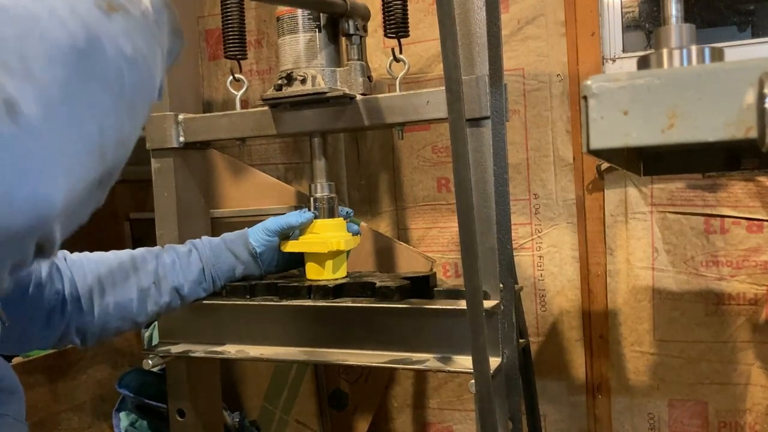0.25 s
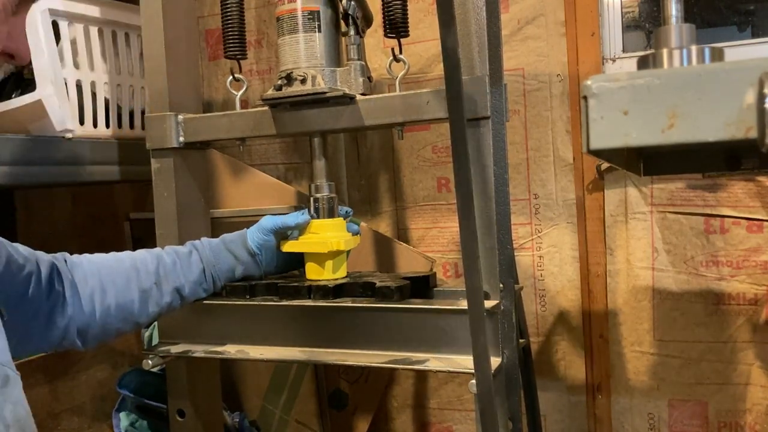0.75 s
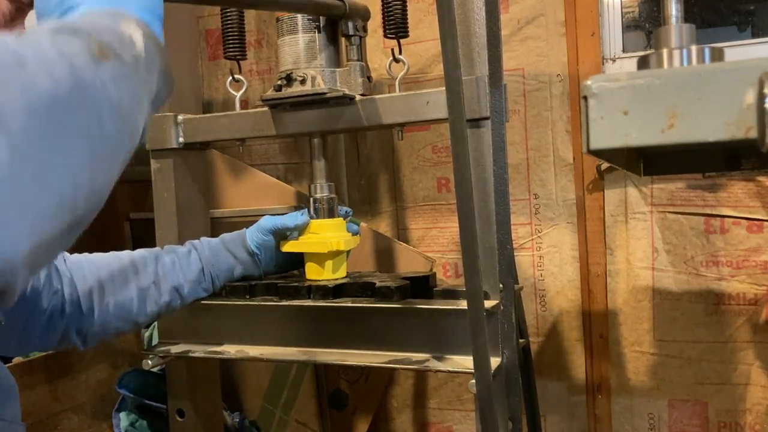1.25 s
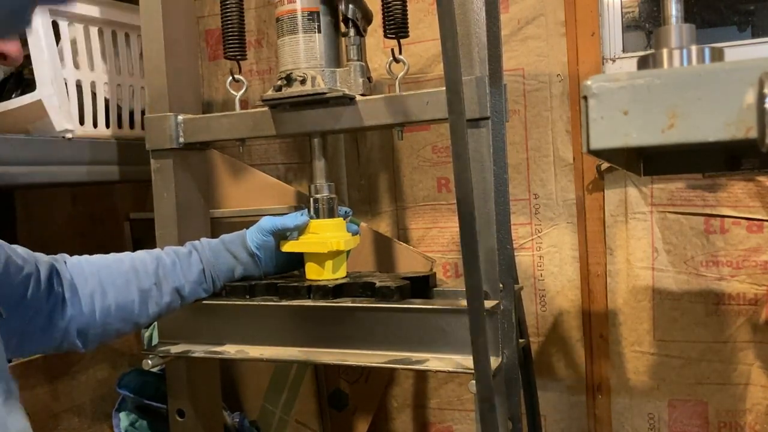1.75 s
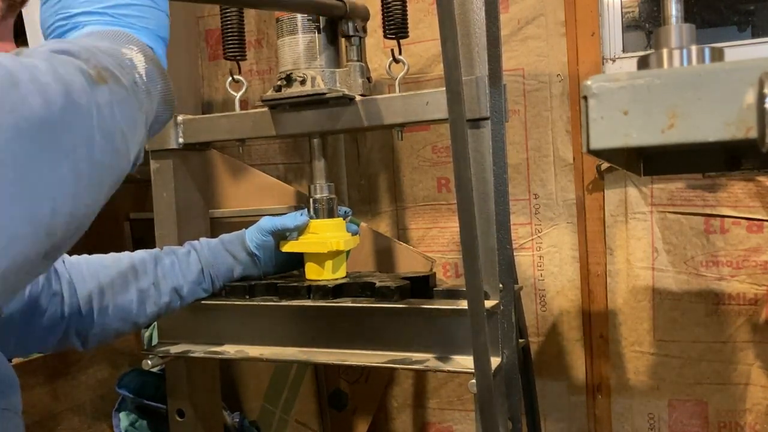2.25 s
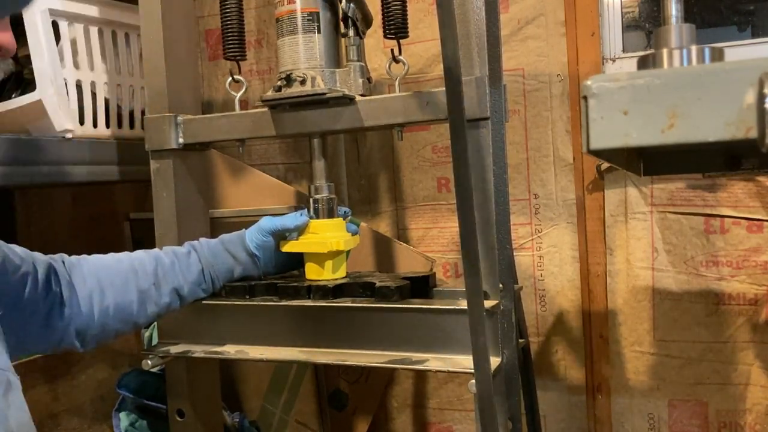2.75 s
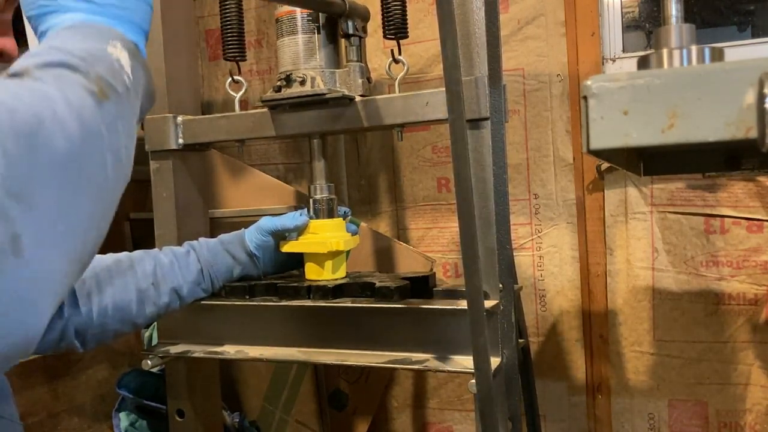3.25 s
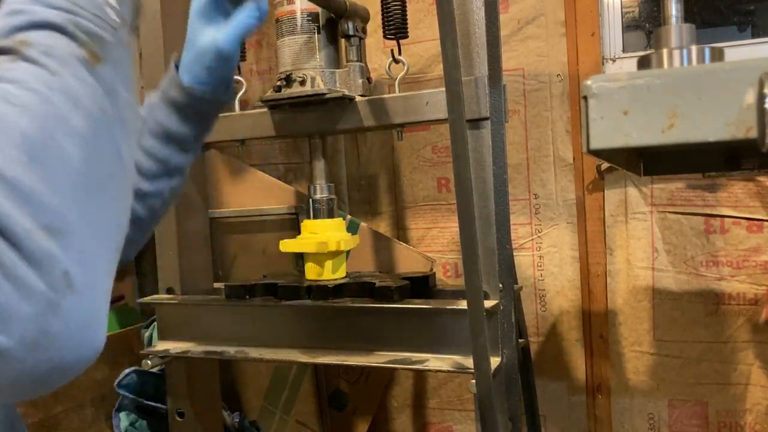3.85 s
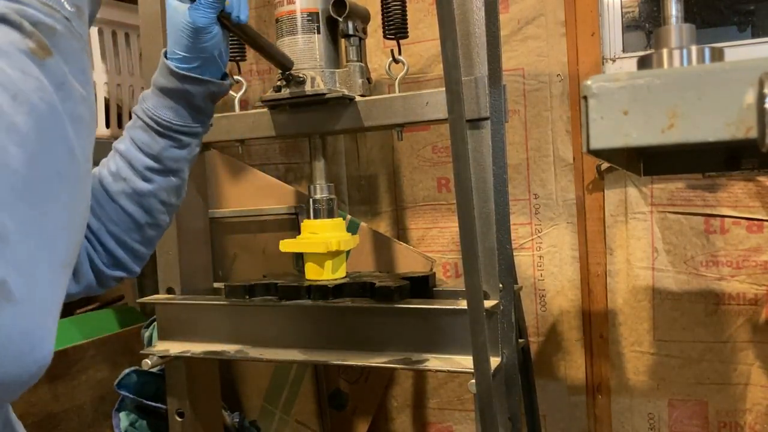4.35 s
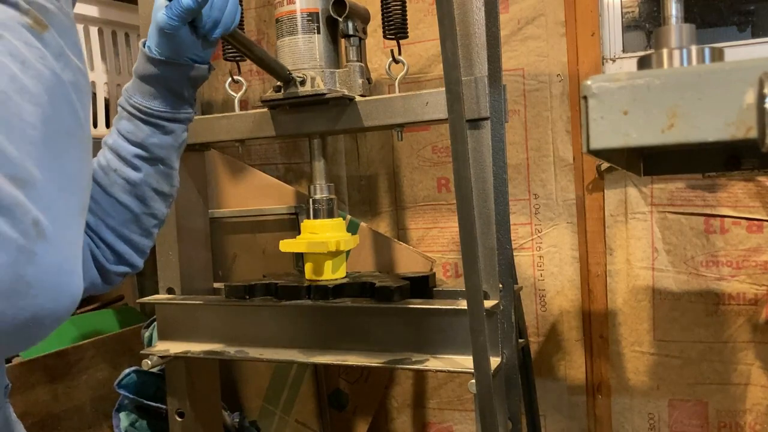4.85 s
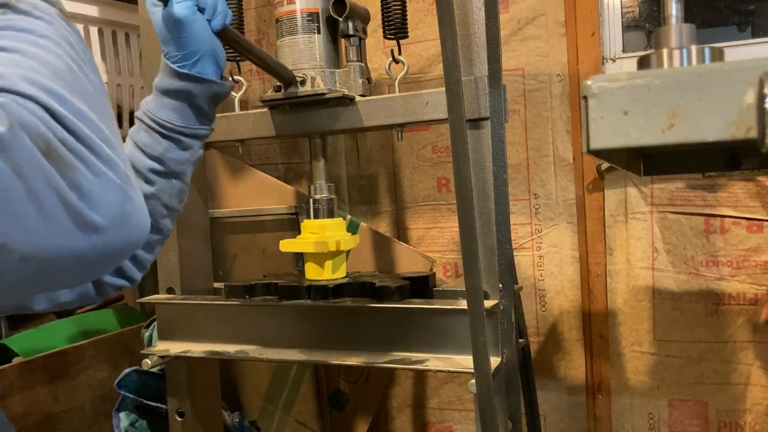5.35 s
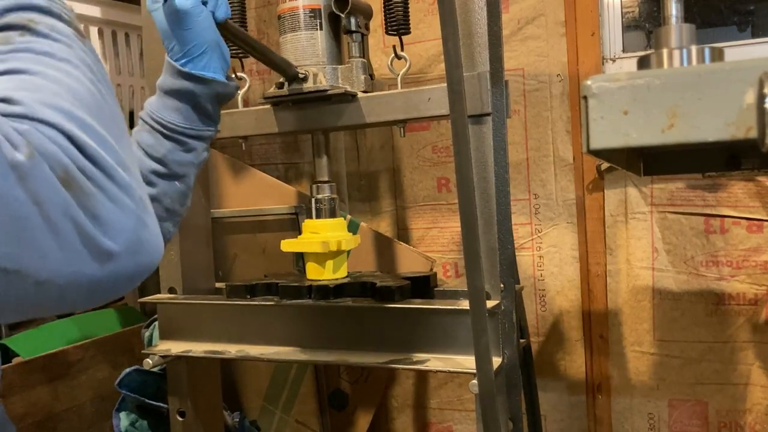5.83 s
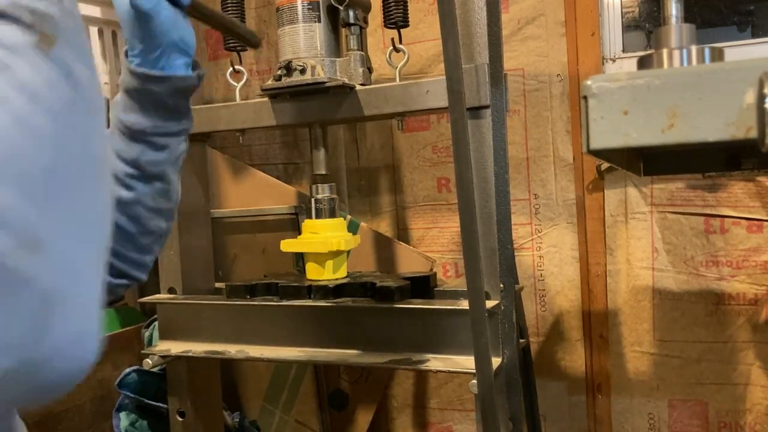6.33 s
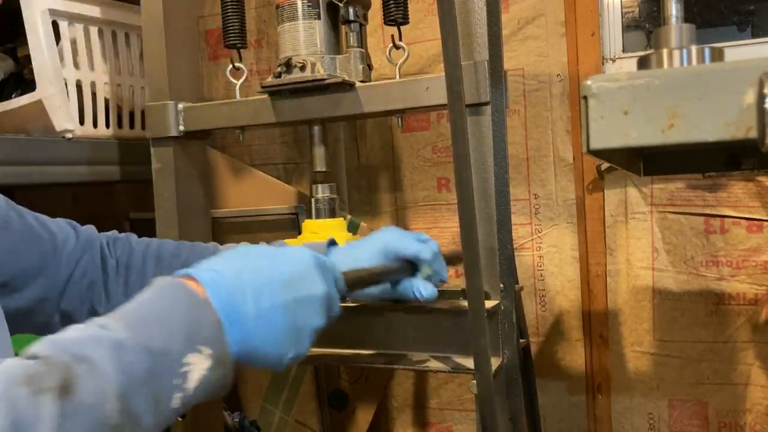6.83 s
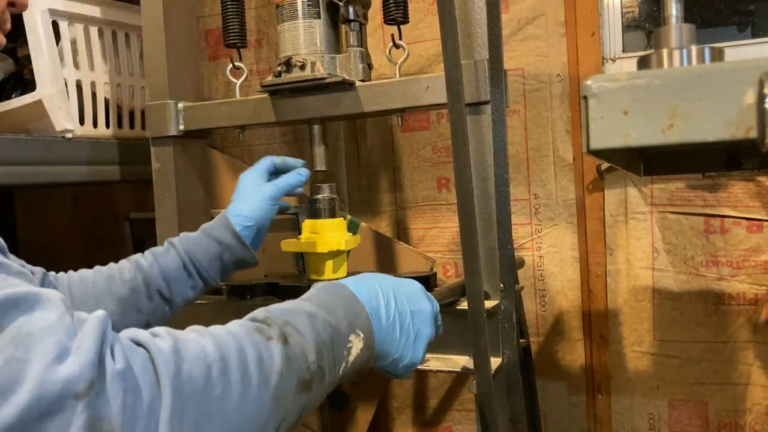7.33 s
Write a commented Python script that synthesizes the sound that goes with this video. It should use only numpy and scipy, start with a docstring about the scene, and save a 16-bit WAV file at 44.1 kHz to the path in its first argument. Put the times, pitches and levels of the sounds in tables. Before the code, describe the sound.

Two metallic bangs from a loaded shop press, then light pump clicks and clunks, a handle rattling loose with hard knocks, and a clang onto steel.

```python
"""A hand-pumped bottle-jack press slips with two bangs, then its pump linkage clicks and clunks.
The pipe handle is drawn out, knocks on the jack and frame, rings at light taps and clangs onto the bed.
Each blow layers coloured noise, ringing modes, low frame booms and a room tail.
Behind it the return springs hum as beating sines over a noise wash that the heavier blows feed.
A sleeve rustles and the air murmurs: both are coloured stereo noise."""
import sys
import numpy as np
from scipy import signal
from scipy.fft import rfft, irfft, next_fast_len
from scipy.io import wavfile
from scipy.ndimage import map_coordinates

SR = 44100
rng = np.random.default_rng(int(sys.argv[2]) if len(sys.argv) > 2 else 0)


def file_out(sig):
    """Save sig as 16-bit WAV at sys.argv[1]."""
    # one column per channel
    cols = np.atleast_2d(sig).T
    # limit, then scale
    lim = np.clip(cols, -1, 1)
    pcm = np.round(lim * 32767).astype(np.int16)
    wavfile.write(sys.argv[1], SR, pcm)


N = 334719
TAIL_S = np.arange(int(.75 * SR)) / SR  # time axis of one blow

# Still air, colour: pitch_hz, relative level_db
AIR_COLOUR = [(15, -29.5), (25, 10.5), (76, -6.5), (123, -17.5), (560, -20), (1040, -24), (1940, -32.5),
              (5880, -42), (7920, -37.5), (9320, -44), (10400, -46.5), (13600, -40.5), (16000, -27.5)]
# Sleeve movement before its trim and flutter: start_s, level_db
SLEEVE_MOVES = [(0, -63), (0.6, -68.5), (1.1, -81), (1.6, -74), (2.2, -77.5), (2.7, -87), (3.75, -75),
                (4.7, -78), (5.05, -68), (5.35, -67), (5.7, -49), (6.0, -65.5), (6.4, -66), (6.63, -56),
                (6.93, -64), (7.2, -64.5), (7.59, -77)]
# Cloth, colour: pitch_hz, relative level_db
CLOTH_COLOUR = [(500, -17), (2000, -3.5), (5000, -8), (8000, -6), (12000, 0.5), (16000, -10)]
# Return springs, beating lines: pitch_hz, relative level_db
SPRING_LINES = [(253.0, -74), (527.6, -63.5), (570.6, -72), (716.0, -79), (759.0, -58.5), (882.9, -70),
                (1023, -80.5), (1071, -52), (1125, -86)]
# Return springs, colour of the close modes: pitch_hz, relative level_db
SPRING_WASH = [(25, -26), (55, -9), (130, -21), (250, -17), (450, -22.5), (620, -6.5), (850, -22),
               (990, -7.5), (1070, 1.5), (1160, -5), (1300, -17.5), (2500, -33), (5000, -67)]

# Blow columns: start_s, strength_db, hardness_db_per_octave, jolt_db (shake of the frame),
# ring_db (against the strength)
# Handle landing on the bed: blow columns
CLANGS = [(6.975, -6, 0.5, -41, -6.5), (7.02, -27.5, -7, -49.5, -2)]
# Handle tapped and ringing freely: blow columns, spot_hz (mode favoured by the spot that is hit)
TAPS = [(3.8145, -27.5, 5.5, -49, -8.5, 4113), (3.8535, -26, 2, -46.5, 2.5, 2570),
        (3.8939, -35.5, 3, -56.5, 5.5, 1360), (3.934, -34.5, 5, -66, 5.5, 2581),
        (3.9685, -40, 4, -66, 8.5, 10137), (4.335, -33.5, 0.5, -62, -2.5, 1066),
        (4.3449, -29, -1.5, -49, -1.5, 2581), (6.2513, -49.5, 4.5, -50, -0.5, 2581),
        (7.1436, -20, -2, -43, -14, 2581), (7.2616, -20.5, -4, -42, -17, 4113),
        (7.331, -23.5, -5.5, -48.5, -6, 4113), (7.3619, -31.5, -7.5, -49, -4.5, 2581)]
# Handle knocking on the jack and shaking the frame: blow columns
KNOCKS = [(1.1658, -19, -2, -39, -8), (2.13, -29, -4, -44, -10), (3.468, -50, -7.5, -61, -13),
          (4.5938, -49, -7.5, -72, -14), (4.6647, -37.5, -12.5, -56, -12), (4.749, -17, -1.5, -35.5, -10.5),
          (5.1285, -20.5, -1, -36.5, -22), (5.184, -8, 2, -27.5, -0.5), (5.544, -37.5, -3, -30.5, -17),
          (5.569, -16, 4.5, -33, -13), (5.6121, -5, 2, -24, -3.5), (5.7351, -21.5, 4, -27, 0),
          (5.7919, -33.5, 4, -31, 2), (5.851, -10, -0.5, -23.5, -2), (6.088, -27.5, -10, -42, -3),
          (6.111, -15.5, -1, -36, -3.5), (6.1897, -32, -6, -41, -4.5), (7.4017, -28.5, -8.5, -53.5, -5.5),
          (7.5304, -51, -14.5, -48, -9)]
# Handle wrenched in its socket: start_s, level_db
WRENCHES = [(5.742, -25.5), (5.87, -34), (6.17, -35)]
# Pump linkage taking up its play: start_s, strength_db, hardness_db_per_octave
CLICKS = [(0.4756, -33, -2), (0.5564, -34.5, -2.5), (0.858, -35, -5), (0.884, -43, 5.5),
          (1.3534, -28.5, -3.5), (1.3981, -29, 2.5), (1.5355, -36.5, 0), (1.5902, -33.5, -4.5),
          (1.6106, -43.5, -2.5), (1.7741, -34.5, 4), (2.4157, -33.5, -7.5), (2.4604, -32.5, 4),
          (2.4959, -24, -0.5), (2.5483, -30.5, 0.5), (2.6211, -27.5, -1.5), (2.834, -32.5, -6.5),
          (2.8509, -44, 5.5), (3.0196, -49, 1), (3.2758, -66.5, 5.5), (3.7198, -34.5, 1),
          (3.7962, -37, 5.5)]
# Pump reaching the end of a stroke: blow columns
CLUNKS = [(0.914, -24, -0.012, -44, -10.5), (1.7997, -24, -0.053, -40.5, -10.5),
          (2.8746, -22, -0.0039, -40, -6)]
# Part slipping under load: blow columns
SLIPS = [(0.0811, -12, 0, -24, -5.5), (0.1997, -8.5, -1, -38, -0.5)]

# Contact and thud colours: pitch_hz, level_db (against the strength; the thud's against the jolt)
CLANG_COLOUR = [(90, -8), (270, -8), (870, 9), (2700, 9), (5000, 3.5), (8700, -1.5), (14000, 4.5)]
TAP_COLOUR = [(90, -6.5), (270, -7), (870, 16), (2700, 8), (5000, -3), (8700, -11.5), (14000, -12.5)]
KNOCK_COLOUR = [(90, -5.5), (270, 1), (870, 13), (1700, 12.5), (2700, 3), (5000, -7), (8700, -19),
                (14000, -19)]
CLICK_COLOUR = [(90, -5), (270, 3.5), (870, 14), (2700, 8.5), (5000, 1), (8700, 1.5), (14000, 0)]
CLUNK_COLOUR = [(90, -6), (270, 7.5), (870, 15), (2700, 7.5), (5000, -4), (8700, -11.5), (14000, -4)]
SLIP_COLOUR = [(90, -12.5), (270, -0.5), (870, 12.5), (2700, 12), (5000, -1), (8700, -6), (14000, -11.5)]
THUD_COLOUR = [(40, 8.5), (87, 23.5), (200, 21.5), (330, 14), (600, 3), (1500, -26.5), (5000, -60)]

# Modes of each steel piece: pitch_hz, relative level_db, t60_s (before the cap set for the blow)
BED_MODES = [(1020, 6, .24), (1900, -9, .3), (2549, -8, .4), (2797, -8, .3), (3375, -6, .28),
             (3644, 1, .36), (3889, -3, .29), (4760, 1, .3), (5569, -7, .32), (6476, -6, .29),
             (7402, -12, .31), (7642, -10, .31), (8341, -4, .22), (8436, -10, .21), (10131, -6, .45),
             (10344, -14, .4), (10847, 1, .28), (10995, -6, .27), (11281, -6, .27), (12228, -9, .35)]
PIPE_MODES = [(1066, -8, 0.6), (1338, -8, 0.6), (1933, -11, 0.6), (2581, 2, 0.6), (4113, -6, 0.5),
              (5830, -16, 0.45), (10137, -8, 0.58), (10559, -12, 0.6), (10861, -6, 0.6), (11394, -22, 0.55)]
FRAME_MODES = [(310, -9, 0.6), (433, -10, 0.53), (528, -6, 0.53), (619, -9, 0.52), (732, -2, 0.43),
               (832, -6, 0.47), (974, -11, 0.47), (1071, -8, 0.6), (1252, -3, 0.41), (1370, -1, 0.54),
               (1470, -11, 0.56), (1537, -7, 0.6), (1620, -4, 0.4), (1688, -11, 0.41), (1973, -4, 0.37),
               (2113, -1, 0.37), (2175, -12, 0.39), (2323, -4, 0.41), (2433, -8, 0.42), (2490, -11, 0.46),
               (2606, -6, 0.5), (2807, -8, 0.6), (3311, -13, 0.39), (3513, -15, 0.52), (3644, -18, 0.53),
               (3830, -16, 0.48), (4059, -9, 0.48), (4546, -17, 0.47), (4643, -17, 0.46), (5348, -21, 0.5)]
LINKAGE_MODES = [(1803, -7, 0.2), (2347, -7, 0.2), (2832, -8, 0.2), (3319, -12, 0.2), (3809, -10, 0.2),
                 (4148, -11, 0.2), (5897, -11, 0.2), (7755, -11, 0.2), (8958, -12, 0.11), (9246, -12, 0.2),
                 (10559, 0, 0.1), (11913, -14, 0.2)]
PLATE_MODES = [(253, -14, 0.8), (519, -12, 0.47), (616, -13, 0.57), (735, -7, 0.28), (1082, -10, 0.52),
               (1214, -4, 0.34), (1367, -6, 0.8), (1556, -8, 0.44), (1943, -9, 0.29), (2097, -14, 0.43),
               (2266, -14, 0.36), (2431, -13, 0.37), (2549, -14, 0.37), (2662, -13, 0.36), (2813, -5, 0.27),
               (3039, -12, 0.47), (3254, -18, 0.35), (3548, -13, 0.32), (3830, -12, 0.32),
               (3976, -16, 0.35), (4089, -16, 0.43), (4751, -4, 0.4), (5760, -19, 0.33), (6823, -19, 0.28)]
# Low modes of the whole frame: pitch_hz, level_db (against the jolt, before the boom trim), t60_s
SWAY_MODES = [(71.7, -6, 0.4), (99, 0.5, 0.24), (124.8, -9.5, 0.29), (206.5, -8, 0.55), (238, -8, 0.37),
              (295, -11.5, 0.21), (345, -12, 0.41)]
# Frame drone under the wrenches: pitch_hz, level_db (against the wrench), t60_s
DRONE_MODES = [(221, -6.5, 0.54), (254.5, 1.5, 0.61)]
# Barely damped notes of the bed, frame and plate: pitch_hz, level_db (against the ring), t60_s
BED_NOTES = [(4600, -37, 1.7)]
FRAME_NOTES = [(1367, -22, 1.08), (1595, -15, 0.48), (1594, -17, 0.39), (3500, -34.5, 0.9)]
PLATE_NOTES = [(129.5, -31.5, 2.4), (1367, -12, 2.2)]

# Room decay: pitch_hz, t60_s
ROOM_DECAY = [(70, 0.74), (250, 0.71), (1000, 0.36), (3000, 0.39), (7000, 0.32), (14000, 0.28)]
# Stereo width of the direct contact noise: pitch_hz, left_right_likeness (1 is mono)
DIRECT_ALIKE = [(100, 1), (500, 0.76), (2000, 0.53), (8000, 0.22)]
# Stereo width of the room and background noise: pitch_hz, left_right_likeness (1 is mono)
ROOM_ALIKE = [(100, 0.94), (300, 0.92), (700, 0.6), (2000, 0.05), (10000, .2)]
# Microphone colour: pitch_hz, level_db
MICROPHONE = [(25, -31.5), (45, -10), (65, 4), (110, 3), (160, -1.5), (250, 4.5), (600, -7), (2200, -6),
              (3200, -2.5), (4700, 1.5), (6000, -1.5), (8300, 4.5), (11000, -1.5), (16000, -13)]
# Notches of the microphone port: centre_hz, width_hz, depth_db
PORT_DIPS = [(9114, 710, 22), (14360, 650, 16)]

TOP_HZ = 16200  # band limit
CLICK_JOLT_DB, CLICK_RING_DB = -18, -5.5  # against the strength of a click; hardness adds to the ring
SWAY_LAG_S, SWAY_RISE_S = .018, 0.014  # the heavy frame answers late
FAVOUR_DB, FAVOUR_OCTAVES = 6.5, .3  # lift and width around the favoured pitch
PLATE_AT_START_DB, SPRINGS_AT_START_DB = -19, -45  # both still ring from an earlier slip
SPRING_T60_S, SPRING_RISE_S = 5.48, 0.031
SLIP_TO_SPRING_DB, BLOW_TO_SPRING_DB = -38, -46  # a slip jerks the springs hardest
HARDNESS_PIVOT_HZ = 1500  # the contact colour tilts around this
HIGH_MODE_HZ = 3000  # modes above this follow the hardness of the contact


def amp(db):
    """Decibels to gain."""
    return 10 ** (np.asarray(db) / 20)


def unit(x):
    """Scale to rms 1."""
    return x / np.sqrt(np.mean(x ** 2) + 1e-20)


def along(points, hz):
    """Read a (pitch, value) curve on a log pitch axis."""
    pitch, value = np.transpose(points)
    return np.interp(np.log(hz + 1), np.log(pitch + 1), value)


def curve(rows):
    """Draw (time, value) rows as one value per sample."""
    return np.interp(np.arange(N) / SR, *np.transpose(rows))


def wobble(rate, size):
    """A smooth random curve, rate knots a second."""
    knots = rng.standard_normal(int(size * rate / SR) + 4)
    return map_coordinates(knots, [np.arange(size) * rate / SR])


def fade(t, t60):
    """Exponential decay, 60 dB down after t60 seconds."""
    return np.exp(-np.log(1000) * t / np.maximum(t60, 1e-3))


def filtered(x, response):
    """Shape x by a response of frequency."""
    size = x.shape[-1]
    padded = next_fast_len(size + 4096)
    spectrum = rfft(x, padded) * response(np.fft.rfftfreq(padded, 1 / SR))
    return irfft(spectrum, padded)[..., :size]


def add(track, start_s, sound):
    """Mix a sound into the track from its start time."""
    start = max(round(start_s * SR), 0)
    track[:, start:start + sound.shape[-1]] += sound[..., :N - start]


def noise(spectrum, alike, size):
    """Stereo noise with a colour and a left-right likeness, balanced between mid and side."""
    def mid_side(hz):
        turn = np.arccos(np.clip(along(alike, hz), -1, 1)) / 2
        return amp(along(spectrum, hz)) * [np.cos(turn), np.sin(turn)]

    mid, side = filtered(rng.standard_normal((2, size)), mid_side)
    return np.array([mid + side, mid - side])


def placed(x, lead_ms, pan_db):
    """Sound from the left reaches the left port sooner and louder."""
    side = np.array([[.5], [-.5]])
    return filtered(x, lambda hz: amp(side * pan_db) * np.exp(2j * np.pi * hz * side * lead_ms / 1000))


def lingering(kicks, t60, rise_s):
    """Envelope of a resonator that stores the energy of (s, dB) kicks and slowly loses it."""
    start_s, level_db = np.transpose(kicks)
    energy = np.bincount(np.round(start_s * SR).astype(int), amp(level_db) ** 2, N)
    stored = signal.lfilter([1], [1, -fade(1 / SR, t60) ** 2], energy)
    keep = np.exp(-1 / (rise_s * SR))
    return np.sqrt(signal.lfilter([1 - keep], [1, -keep], stored))


def singing(kicks, modes, rise_s):
    """Barely damped modes sing on after (s, dB) kicks."""
    t = np.arange(N) / SR
    return sum(amp(db) * np.sin(2 * np.pi * hz * t) * lingering(kicks, t60, rise_s)
               for hz, db, t60 in modes)


def notes(table, modes, earlier=()):
    """Each blow kicks the long notes of the steel as hard as it rings."""
    kicks = [(start_s, strength + ring_db) for start_s, strength, _, _, ring_db in table]
    return singing(kicks + list(earlier), modes, rise_s=.003)


def favoured(modes, centre_hz):
    """The spot that is hit drives the modes near one pitch more than the rest."""
    def lift(hz):
        return FAVOUR_DB * np.exp(-(np.log2(hz / centre_hz) / FAVOUR_OCTAVES) ** 2)

    return [(hz, db + lift(hz), t60) for hz, db, t60 in modes]


def sways(table, favoured_hz, boom_db):
    """Low modes of the whole frame boom in proportion to each jolt."""
    track = np.zeros((2, N))
    hz, db, t60 = np.transpose(favoured(SWAY_MODES, favoured_hz))
    waves = np.sin(2 * np.pi * hz[:, None] * TAIL_S) * fade(TAIL_S, t60[:, None])
    waves *= 1 - np.exp(-TAIL_S / SWAY_RISE_S)
    for start_s, _, _, jolt, _ in table:
        gain = amp(jolt + boom_db + db + rng.standard_normal(len(hz)))
        add(track, start_s + SWAY_LAG_S, gain @ waves)
    return track


def rebounding(table, flight_s, loss_db, softer):
    """Each blow gets a duller second contact, quieter by loss_db (louder if negative)."""
    return table + [(start_s + flight_s, strength - loss_db, hardness - softer, jolt - loss_db, ring_db)
                    for start_s, strength, hardness, jolt, ring_db in table]


def blow_colour(colour, strength, hardness, jolt):
    """A harder contact tilts the colour towards the treble; the jolt adds a thud below it."""
    hz = np.geomspace(40, 16000, 40)
    octaves = np.maximum(np.log2(hz / HARDNESS_PIVOT_HZ), -1)
    clash = amp(strength + along(colour, hz) + hardness * octaves)
    thud = amp(jolt + along(THUD_COLOUR, hz))
    return np.column_stack([hz, 20 * np.log10(np.hypot(clash, thud))])


def crowded(spectrum, depth_db):
    """Countless short-lived modes cut a colour into peaks and valleys, new for each contact."""
    hz = np.geomspace(630, 17000, 170) - 600
    peaks = depth_db * np.clip(rng.standard_normal(len(hz)), -2, 2) * np.minimum(hz / 500, 1)
    mean_lift_db = 10 * np.log10(np.mean(amp(peaks) ** 2))
    return np.column_stack([hz, along(spectrum, hz) + peaks - mean_lift_db])


def ring(modes, spectrum, longest_s, prompt_db, contact_t60):
    """Modes sound a prompt part while the pieces touch, then ring freely; a dull blow weakens high ones."""
    hz, db, t60 = np.transpose(modes)
    t = TAIL_S[::64]  # coarse grid for the slow envelopes
    dull = np.minimum(along(spectrum, hz) - along(spectrum, 2700), 0) / 3
    shared_spread = 2 * rng.standard_normal(len(hz))
    side_spread = 2 * rng.standard_normal((2, len(hz)))
    gain = amp(db + dull + shared_spread + side_spread)
    phase, beat_phase = rng.uniform(0, 2 * np.pi, (2, len(hz), 1))
    # each mode stands for a close pair, so it beats at its own rate
    beat_hz = rng.uniform(6, 28, (len(hz), 1))
    beat = 1 + .55 * np.cos(2 * np.pi * beat_hz * t + beat_phase)
    free = beat * fade(t, np.minimum(t60, longest_s)[:, None])
    life = free + amp(prompt_db) * fade(t, contact_t60)
    waves = [np.sin(2 * np.pi * f * TAIL_S + p) * np.interp(TAIL_S, t, envelope)
             for f, p, envelope in zip(hz, phase, life)]
    return gain @ np.array(waves) / np.linalg.norm(amp(db))


def workshop(spectrum, build_s):
    """The room's answer builds up, slowest in the bass, and each pitch dies at its own speed."""
    hz, t, cells = signal.stft(noise(spectrum, ROOM_ALIKE, len(TAIL_S)), SR, nperseg=256)
    swell = 1 - np.exp(-t / (build_s + 1.8 / (hz[:, None] + 60)))
    decay = fade(t, along(ROOM_DECAY, hz)[:, None])
    return signal.istft(cells * swell * decay, SR, nperseg=256)[1][:, :len(TAIL_S)]


def blows(table, colour, modes, t60, contact_db, snap_db, steel_db, prompt_db, room_db,
          scuff_db, scuff_t60, rise_s, build_s, chatter_db, longest_s):
    """Steel meets steel: a scuff, a bright snap, a chattering clash, the ring of the piece and the room."""
    track, size = np.zeros((2, N)), len(TAIL_S)
    lead = SR // 25  # length of scuff and snap in samples
    for start_s, strength, hardness, jolt, ring_db in table:
        spectrum = blow_colour(colour, strength, hardness, jolt)
        metal = crowded(spectrum, 6)
        chatter = amp(contact_db + chatter_db * wobble(260, size))
        contact = chatter * noise(metal, DIRECT_ALIKE, size)
        driven = [(hz, db + hardness * np.log2(max(hz / HIGH_MODE_HZ, 1)), life) for hz, db, life in modes]
        steel = amp(strength + ring_db + steel_db) * ring(driven, spectrum, longest_s, prompt_db, t60)
        room = amp(room_db) * workshop(metal, build_s)
        onset = 1 - np.exp(-TAIL_S / rise_s)
        add(track, start_s, (contact * fade(TAIL_S, t60) + steel + room) * onset)
        snap = filtered(contact[:, lead:2 * lead], lambda hz: hz ** 2 / (hz ** 2 + 6000 ** 2))
        add(track, start_s + rise_s, amp(snap_db) * snap * fade(TAIL_S[:lead], 0.023))
        # the scuff swells until the pieces meet
        scuff = contact[:, -lead:] * fade(TAIL_S[:lead], scuff_t60)[::-1]
        add(track, start_s + rise_s - lead / SR, amp(scuff_db) * scuff)
    return track


def still_air():
    """A steady bed of wide noise, weighted to the low bass."""
    return amp(-66.5) * unit(noise(AIR_COLOUR, ROOM_ALIKE, N))


def sleeve():
    """Cloth brushes unevenly as the arm moves."""
    level_db = curve(SLEEVE_MOVES) + 4.5 + 3.1 * wobble(46, N)
    return amp(level_db) * unit(noise(CLOTH_COLOUR, ROOM_ALIKE, N))


def springs():
    """All blows but the light clicks shake the coils: a few wavering lines hum over a wash of close modes."""
    kicks = [(0, SPRINGS_AT_START_DB)]
    kicks += [(start_s, strength + SLIP_TO_SPRING_DB) for start_s, strength, *_ in SLIPS]
    kicks += [(start_s, strength + BLOW_TO_SPRING_DB)
              for start_s, strength, *_ in CLUNKS + KNOCKS + TAPS + CLANGS]
    t = np.arange(N) / SR

    def line(hz, db):
        level = amp(db) * (1 + 0.32 * wobble(5.2, N))
        return level * np.sin(2 * np.pi * hz * t + 0.27 * wobble(8.5, N))

    lines = unit(sum(line(hz, db) for hz, db in SPRING_LINES))
    wash = unit(noise(SPRING_WASH, ROOM_ALIKE, N))
    return lingering(kicks, SPRING_T60_S, SPRING_RISE_S) * (amp(5.5) * lines + amp(9.0) * wash)


def clang():
    """The handle lands on the bed beam, which rings and holds one high note."""
    hits = blows(CLANGS, CLANG_COLOUR, BED_MODES, t60=.054, contact_db=-0.5, snap_db=-5, steel_db=-2.5,
                 prompt_db=16.0, room_db=-9.5, scuff_db=-13.5, scuff_t60=0.032, rise_s=0.00067,
                 build_s=.006, chatter_db=4.5, longest_s=.6)
    return hits + notes(CLANGS, BED_NOTES) + sways(CLANGS, favoured_hz=100, boom_db=-1.0)


def taps():
    """The loose pipe handle rings at a light touch, its favoured note set by the spot."""
    hits = sum(blows([blow], TAP_COLOUR, favoured(PIPE_MODES, spot_hz), t60=.06, contact_db=0, snap_db=-1,
                     steel_db=0, prompt_db=13.5, room_db=-3.5, scuff_db=-9.5, scuff_t60=0.028,
                     rise_s=0.0024, build_s=0.0055, chatter_db=4.5, longest_s=0.39)
               for *blow, spot_hz in TAPS)
    return hits + sways([row[:-1] for row in TAPS], favoured_hz=100.1, boom_db=0.0)


def knocks():
    """The handle strikes the jack, rebounds and rings the frame, which drones when it is wrenched."""
    contacts = rebounding(KNOCKS, flight_s=.014, loss_db=4.5, softer=3.8)
    hits = blows(contacts, KNOCK_COLOUR, FRAME_MODES, t60=.11, contact_db=0.0, snap_db=2, steel_db=-5.5,
                 prompt_db=2, room_db=-6.5, scuff_db=-12, scuff_t60=.035, rise_s=0.0022,
                 build_s=0.0017, chatter_db=1.5, longest_s=0.44)
    drone = singing(WRENCHES, DRONE_MODES, rise_s=0.0067)
    return hits + drone + notes(KNOCKS, FRAME_NOTES) + sways(KNOCKS, favoured_hz=74, boom_db=-2.5)


def pump():
    """The linkage clicks lightly during a stroke and clunks, with a double contact, at its end."""
    light = [(start_s, strength, hardness, strength + CLICK_JOLT_DB, CLICK_RING_DB + hardness)
             for start_s, strength, hardness in CLICKS]
    clicks = blows(light, CLICK_COLOUR, LINKAGE_MODES, t60=0.043, contact_db=-5, snap_db=11, steel_db=-2,
                   prompt_db=2, room_db=-9, scuff_db=-5.0, scuff_t60=0.03, rise_s=0.00062,
                   build_s=0.0027, chatter_db=2, longest_s=0.19)
    ends = rebounding(CLUNKS, flight_s=0.0067, loss_db=-0.5, softer=1.1)
    clunks = blows(ends, CLUNK_COLOUR, LINKAGE_MODES, t60=0.093, contact_db=-2.5, snap_db=7.5, steel_db=-5,
                   prompt_db=2.5, room_db=-11, scuff_db=-11, scuff_t60=0.057, rise_s=0.0012,
                   build_s=0.0011, chatter_db=4, longest_s=0.12)
    return clicks + clunks + notes(CLUNKS, FRAME_NOTES) + sways(CLUNKS, favoured_hz=72, boom_db=4.0)


def slips():
    """The part gives way with a bang and leaves the bed plate singing."""
    bangs = blows(SLIPS, SLIP_COLOUR, PLATE_MODES, t60=0.079, contact_db=1.5, snap_db=6.0, steel_db=-1.0,
                  prompt_db=-9.5, room_db=-4.0, scuff_db=-11, scuff_t60=0.038, rise_s=.0008,
                  build_s=.002, chatter_db=2.5, longest_s=.6)
    plate = notes(SLIPS, PLATE_NOTES, earlier=[(0, PLATE_AT_START_DB)])
    return bangs + plate + sways(SLIPS, favoured_hz=100, boom_db=4)


def scene():
    """Mix the air, the sleeve, the clang on the bed and the press, the metal slightly to the left."""
    background = still_air() + sleeve()
    bed = placed(clang(), lead_ms=0.03, pan_db=0.7)
    press = placed(springs() + taps() + knocks() + pump() + slips(), lead_ms=0.066, pan_db=1.3)
    return background + bed + press


def record(dry):
    """The microphone's colour and port dips, overload at full scale, and the band limit."""
    def response(hz):
        dips = sum(depth * np.exp(-((hz - centre) / width) ** 2) for centre, width, depth in PORT_DIPS)
        return amp(along(MICROPHONE, hz) - dips)

    heard = filtered(dry, response)
    return filtered(np.clip(heard, -1, 1), lambda hz: hz < TOP_HZ)


dry = scene()
out = record(dry)
file_out(out)
```